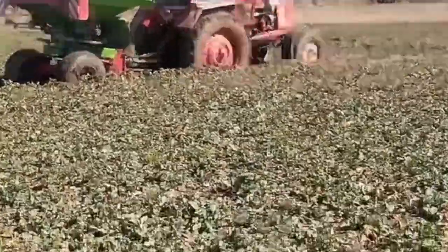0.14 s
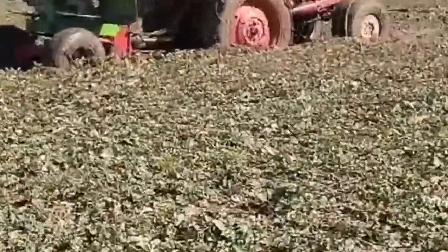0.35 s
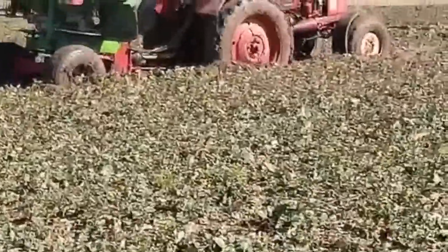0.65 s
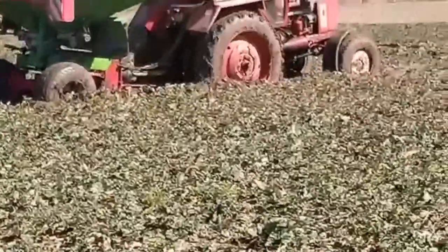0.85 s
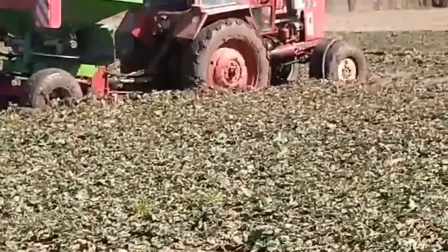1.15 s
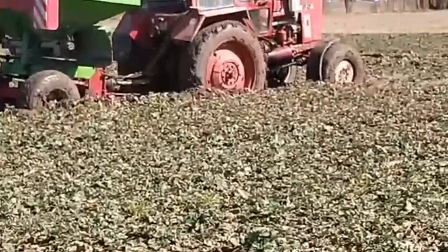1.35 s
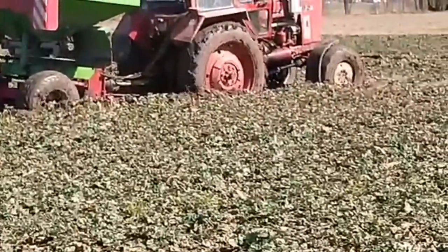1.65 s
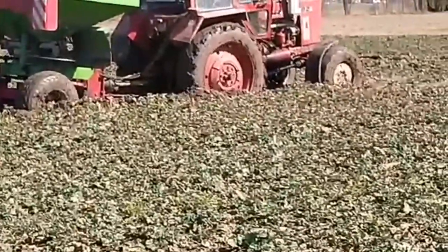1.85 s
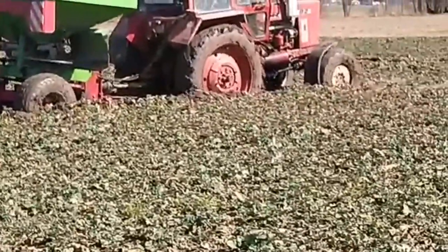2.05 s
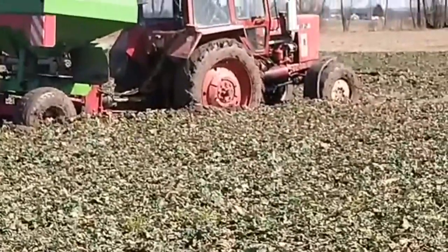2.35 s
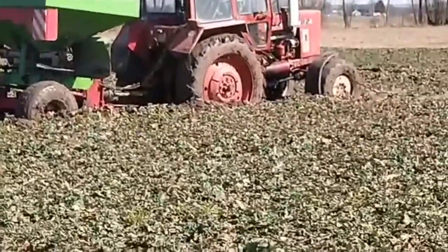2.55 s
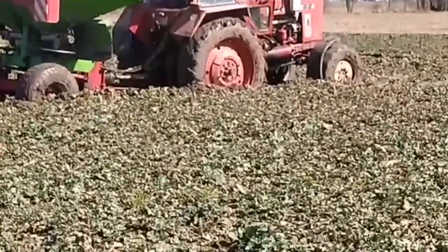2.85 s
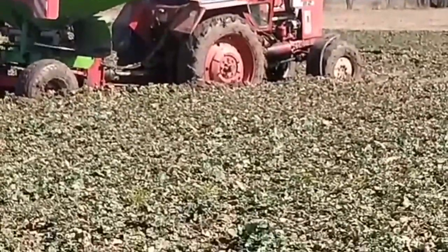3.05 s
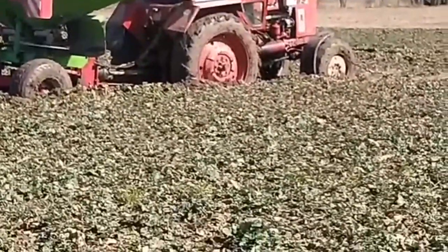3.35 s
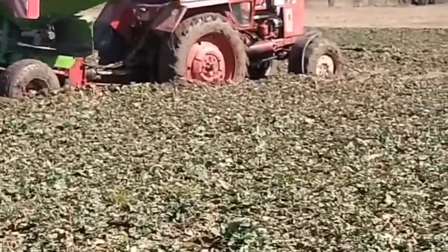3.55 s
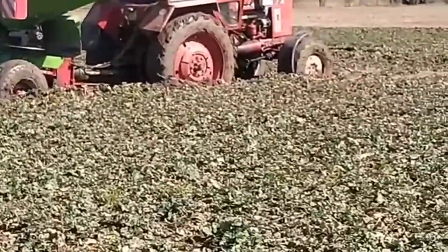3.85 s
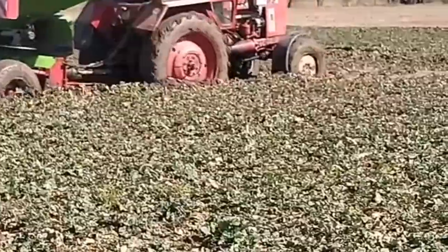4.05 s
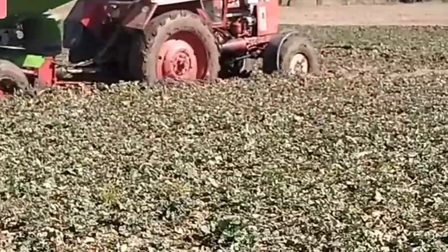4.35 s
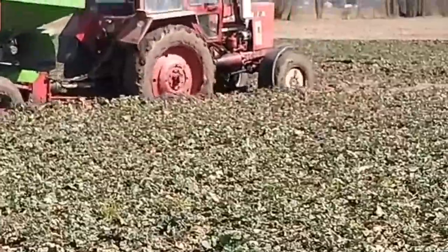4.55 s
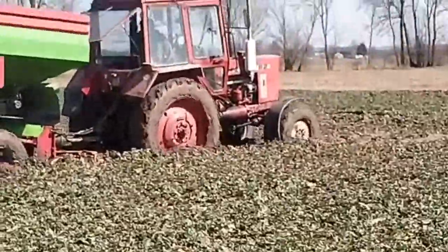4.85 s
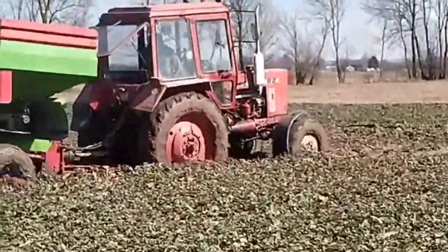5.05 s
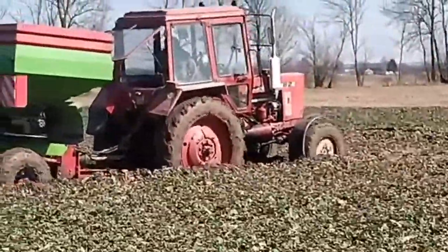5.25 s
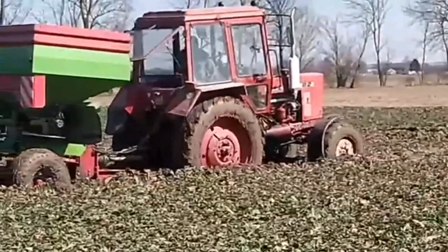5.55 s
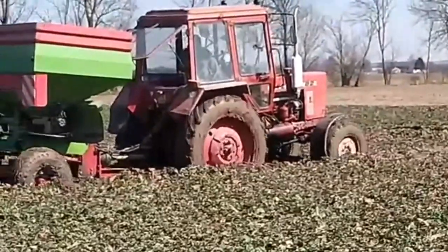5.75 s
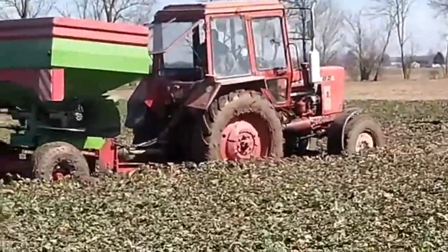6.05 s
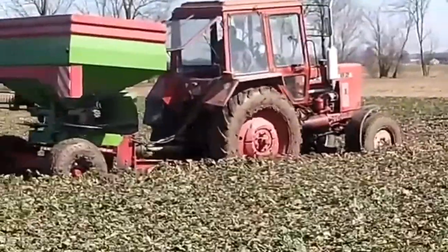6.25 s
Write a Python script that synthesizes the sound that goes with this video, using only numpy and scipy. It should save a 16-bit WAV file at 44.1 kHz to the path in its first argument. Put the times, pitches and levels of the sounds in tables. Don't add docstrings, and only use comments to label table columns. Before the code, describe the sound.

A tractor's diesel engine hums and rattles in an open field, sags to idle, then revs up and holds, while wind thumps the microphone early on.

```python
import sys
import numpy as np
from scipy import signal
from scipy.fft import rfft, irfft, next_fast_len
from scipy.io import wavfile
from scipy.ndimage import uniform_filter1d

SR = 44100
rng = np.random.default_rng(int(sys.argv[2]) if len(sys.argv) > 2 else 0)


def boost(x):
    u = np.asarray(x, float) / 20
    return 10 ** u


def unload_audio(sound):
    columns = np.transpose(np.atleast_2d(sound))
    steps = np.round(np.clip(columns, -1, 1) * 32767)
    wavfile.write(sys.argv[1], SR, steps.astype(np.int16))


N = 282235
SIZE = next_fast_len(N)
TIME = np.arange(N) / SR
HZ = np.maximum(np.fft.rfftfreq(SIZE, 1 / SR), 1)
IDLE_HZ = 45


def rms_one(x):
    return x / np.sqrt(np.mean(x ** 2) + 1e-20)


def in_time(rows):
    s, *columns = np.transpose(rows)
    return [np.interp(TIME, s, c) for c in columns]


def at_hz(points, hz=HZ):
    points = np.array(points)
    return np.interp(np.log(hz), np.log(points[:, 0]), points[:, 1])


def causal(points):
    cepstrum = irfft(at_hz(points) * np.log(10) / 20, SIZE)
    cepstrum[1:SIZE // 2] *= 2
    cepstrum[SIZE // 2 + 1:] = 0
    return np.exp(rfft(cepstrum))


def filtered(lines, response=1):
    return irfft(lines * response, SIZE)[..., :N]


def drift(rate):
    step = 40
    r = np.exp(-2 * np.pi * rate * step / SR)
    slow = signal.lfilter([1], [1, -2 * r, r * r], rng.standard_normal(N // step + 2002))[2000:]
    return np.interp(np.arange(N) / step, np.arange(len(slow)), rms_one(slow - slow.mean()))


def resonances(x, modes):
    out = 0
    for hz, width, top_db in modes:
        r = np.exp(-np.pi * width / SR)
        poles = [1, -2 * r * np.cos(2 * np.pi * hz / SR), r * r]
        out = out + boost(top_db) * signal.lfilter([(1 - r * r) / 2, 0, (r * r - 1) / 2], poles, x)
    return out


def engine():
    # (time [s], firing rate [Hz])
    speed_curve = [(0.2, 62), (1.2, 64.6), (1.52, 65.1), (1.65, 58.5), (1.8, 52.15), (2, 48.52),
                   (2.5, 44.7), (3.25, 43.83), (3.5, 46.56), (3.7, 47.7), (3.9, 51.82), (4, 52.78),
                   (4.1, 55.37), (4.3, 61.4), (4.5, 68.25), (4.62, 70.35), (4.95, 69.5), (6.4, 69.59)]
    # (time [s], load [0-1], fuelling over idle [dB])
    load_curve = [(0, 0.75, 13.5), (.7, 0.83, 8.5), (1.48, 0.6, 12), (1.57, 0.2, -1), (2.43, 0.01, 2.5),
                  (2.47, 0.04, 12.5), (2.8, 0, 4.5), (3.3, 0.14, 4), (3.725, 0.23, 2), (3.745, 0.87, 7.5),
                  (4.2, 0.74, 11.5), (4.64, 0.36, 7.5), (4.68, 0.09, 1), (4.76, 0.03, 8.5), (5.3, 0.15, 13),
                  (6.4, 0.15, 7.5)]
    # (time [s], share [0-1])
    facing_curve = [(0, 0.11), (.4, 0.2), (.9, 0.08), (1.45, 0.02), (3.6, 0.08), (3.85, 0), (4.2, 0.25),
                    (5.3, 0.18), (5.9, .8), (6.2, 0.84), (6.4, 0.85)]
    # (level at idle [dB], share of fuelling [dB/dB], speed effect [dB/octave], gain when side on [dB])
    ranges = [
        (-41, 0.076, 5, 2),
        (-46, 0.56, 4.5, 2.5),
        (-44, 0.29, 7, 6),
        (-50.5, 0.18, 8, 8),
    ]

    speed, = in_time(speed_curve)
    firings = np.cumsum(speed) / SR
    octaves = np.log2(speed / IDLE_HZ)
    load, fuel_db = in_time(load_curve)
    load = np.clip(load, 0, 1)
    facing, = in_time(facing_curve)

    noise = block(firings, load, burst=0.69, regular=0.66)
    below = [0 * HZ] + [1 / (1 + (HZ / hz) ** 8) for hz in (600, 1500, 4900)] + [1 + 0 * HZ]
    rattle = 0
    for low, high, (idle_db, share, octave_db, facing_db) in zip(below, below[1:], ranges):
        level_db = idle_db + share * fuel_db + octave_db * octaves + facing_db * facing
        level_db = level_db + 0.48 * drift(0.9) + 1.0 * drift(25.3)
        band = filtered(noise, high - low)
        rattle = rattle + boost(level_db) * band / np.std(band.mean(axis=0))

    hum_db = -50.5 + 18.5 * np.sqrt(load) + 11.5 * octaves * (1 - load)
    hum = exhaust(firings, load, hum_db) + gearbox()
    low_notes = np.array([boost(-3.0) * np.roll(hum, 8), boost(-8.0) * hum])
    return crossing(rattle) + low_notes


def exhaust(firings, load, hum_db):
    # (multiple of the firing rate [1], level when pulling [dB], level when running free [dB])
    orders = [(1, 1.5, 0), (1.5, -39, -26), (2, -3.5, -14), (2.5, -8, 0), (3, -5.5, -15), (3.25, -30, -11),
              (4, -13, -17), (4.25, -16, -22), (4.5, -21, -24), (4.75, -25, -7), (5, -14, -22),
              (5.5, -19, -11), (6, -18, -24), (6.5, -24, -26), (8.5, -39.5, -26)]
    # (frequency [Hz], width [Hz], gain [dB])
    pipe = [(166.8, 10.7, 0.5), (247, 40, -2.5), (322, 140, -23)]
    full_hz, high_order_loss_db = 69.5, 2.5

    octaves_below_full = np.log2(full_hz / SR / np.gradient(firings))
    hum = 0
    for multiple, pulling_db, free_db in orders:
        free_db = free_db - high_order_loss_db * (multiple - 1) * octaves_below_full
        level_db = load * pulling_db + (1 - load) * free_db + (.3 + .16 * multiple) * drift(4)
        phase = 2 * np.pi * multiple * firings + rng.uniform(0, 7) + .07 * multiple * drift(3)
        hum = hum + boost(level_db) * np.sin(phase)
    hum = hum + resonances(hum, pipe)
    return np.sqrt(2) * boost(hum_db) * hum


def gearbox():
    # (time [s], frequency [Hz], level [dB])
    whine = [(0, 245, -66), (.35, 251, -42), (.8, 256, -39), (1.2, 275, -49), (1.6, 272, -41),
             (1.85, 255, -35.5), (2.15, 223, -52), (2.6, 219, -62), (3.3, 225, -56), (3.55, 237.7, -36.5),
             (3.8, 221.6, -48), (4.05, 200.7, -39), (4.25, 213.4, -64), (4.45, 238.5, -33.5),
             (4.6, 244.7, -32), (4.75, 246.1, -40), (5.3, 246, -40.5), (5.8, 247, -35.5), (6.4, 248.3, -38)]
    hz, level_db = in_time(whine)
    phase = 2 * np.pi * np.cumsum(hz) / SR + .15 * drift(3)
    return np.sqrt(2) * boost(level_db + 1.5 * drift(3)) * np.sin(phase)


def block(firings, load, burst, regular):
    cylinders_db = [-1.5, -6, -3, -4]
    # (frequency [Hz], width [Hz], gain [dB])
    block_modes = [(860.6, 27, 6.5), (1138.4, 35, 2), (2232, 35, -6), (3658, 50, -5)]
    # (frequency [Hz], width [Hz], gain [dB])
    pulling_modes = [(946, 21, 10), (1013, 38, -1.5), (927, 63, 2.5), (699, 97, 6.5), (327, 32, 5.5)]
    # (frequency [Hz], density [dB per Hz])
    left_port = [(40, -5.5), (250, 11.5), (450, 10), (700, -6), (1150, 3.5), (1800, -11.5), (2300, -7),
                 (2650, -8), (3400, -5.5), (4500, -20), (5000, -15), (7000, -20), (9500, -16.5),
                 (12000, -20.5)]
    right_port = [(40, -5), (280, 7), (520, -1), (900, -0.5), (1350, -4), (2000, -4), (2850, -6.5),
                  (3500, -6.5), (4500, -15), (5300, -17), (6500, -9.5), (8800, -10), (10300, -18),
                  (12500, -31.5)]
    # (frequency [Hz], phase [rad])
    left_lead = [(0, 0), (950, -0.6), (1720, -3.2), (2840, -13.2), (3620, -17.5), (4650, -19.6),
                 (4910, -22.0), (5510, -19.2), (6550, -22.2), (7150, -24.6), (10300, -34.3), (11500, -40.6),
                 (11900, -40.7), (13200, -46.5)]
    # (frequency [Hz], likeness [0-1])
    likeness = [(60, 1), (300, .94), (600, .45), (1000, .93), (1550, .7), (1900, .45), (2300, .62),
                (2900, .58), (3400, .68), (4150, .78), (4700, .2), (5100, .2), (5500, .8), (6000, .45),
                (6600, .72), (7200, .4), (9000, .4), (12000, .4)]
    # (frequency [Hz], level [dB])
    ground = [(20, 5), (60, 5.5), (130, 1.5), (260, 2), (430, 1.5), (600, -5), (800, 0)]
    idle_knock = 0.8

    strength_db = np.array(cylinders_db)[firings.astype(int) % 4] + 1.0 * drift(30)
    burst = burst * (1 + idle_knock * IDLE_HZ / SR / np.gradient(firings))
    gate = 1 + burst * boost(strength_db) * np.exp(-(firings % 1) / 0.3)
    gate = gate / np.sqrt(uniform_filter1d(gate ** 2, size=8000))
    shaken = gate * boost(0.29 * drift(42.0)) * rng.standard_normal((3, N))
    shaken[0] += 0.46 * regular * contacts(firings, count=70, jitter_s=.00004, spread_db=-0.5)
    free_ring = (1 - 0.79 * load) * resonances(shaken, block_modes)
    shaken = shaken + free_ring + load * resonances(shaken, pulling_modes)

    shared, own_left, own_right = rfft(shimmer(rms_one(shaken), frames=14, bins=4), SIZE)
    alike = np.clip(at_hz(likeness), 0, 1)
    lead = np.exp(1j * np.interp(HZ, *np.transpose(left_lead)))
    left = np.sqrt(alike) * shared + np.sqrt(1 - alike) * own_left
    left = left * lead * boost(at_hz(left_port) - at_hz(right_port))
    right = np.sqrt(alike) * shared + np.sqrt(1 - alike) * own_right
    return np.array([left, right]) * causal(right_port) * causal(ground)


def contacts(firings, count, jitter_s, spread_db):
    angles, sizes = rng.uniform(0, 4, count), rng.standard_normal(count)
    cycles = np.arange(int(firings[-1] / 4))[:, None]
    chance = rng.standard_normal((len(cycles), count, 2))
    at = np.interp(4 * cycles + angles, firings, TIME) + jitter_s * chance[..., 0]
    clicks = np.zeros(N)
    places = np.clip(at * SR, 0, N - 1).astype(int)
    np.add.at(clicks, places, sizes * boost(spread_db * chance[..., 1]))
    blunt = signal.butter(2, 2500, fs=SR, output="sos")
    return rms_one(signal.sosfilt(blunt, clicks))


def shimmer(x, frames, bins):
    # (frequency [Hz], spread [dB])
    patchy = [(800, .5), (1500, .5), (3000, .6), (5000, 3), (7500, 1.5), (10000, 2), (13000, 2.5)]
    # (time [s], turn [0-1])
    casing = [(0, 0.34), (.6, 0.36), (.68, 0.63), (1.3, 0.89), (1.95, 0.9), (2.05, 0.85), (3.1, 0.45),
              (3.4, 0.67), (3.84, 0.4), (3.9, 0.2), (5.3, 0.37), (5.55, 0.64), (5.88, 0.67), (6, 0.26),
              (6.15, 0.46), (6.4, 0.83)]
    # (time [s], frequency [Hz], level [dB])
    wandering_notch = [(0, 1420, 2), (.85, 1400, 2.5), (1.0, 1445, -15), (1.3, 1430, -12), (1.45, 1580, -1),
                       (1.6, 1580, -13), (2.2, 1570, -7), (2.55, 1515, -3.5), (2.7, 1390, -13), (3.0, 1575, -8),
                       (3.4, 1577, -11), (3.62, 1445, -12), (3.9, 1500, 1), (4.5, 1554, -0.5), (4.8, 1600, -8),
                       (5.5, 1600, -5.5), (5.85, 1580, -15), (6.05, 1600, -1)]

    def bump(centre_hz, width_hz):
        return np.exp(-((hz[:, None] - centre_hz) / width_hz) ** 2)

    hz, s, cells = signal.stft(x, SR, nperseg=512)
    field = rng.standard_normal(cells.shape)
    for axis, size in ((1, bins), (2, frames), (1, bins), (2, frames)):
        field = uniform_filter1d(field, size=size, axis=axis)
    turn = np.interp(s, *np.transpose(casing))
    notch_db = (4.5 - 21 * turn) * bump(4930 + 350 * turn, 450)
    notch_db += -4 * np.sqrt(np.clip(turn + 0.19, 0, 1)) * bump(6722 - 400 * turn, 120)
    dip_s, dip_hz, dip_db = np.transpose(wandering_notch)
    notch_db += np.interp(s, dip_s, dip_db) * bump(np.interp(s, dip_s, dip_hz), 73)
    cells = cells * boost(at_hz(patchy, hz + 1)[:, None] * rms_one(field) + notch_db)
    return signal.istft(cells, SR, nperseg=512)[1][:, :N]


def crossing(x):
    # (frequency [Hz], left [dB], right [dB], left lead [rad])
    seen_from_behind = [(416, 0, -0.5, -0.37), (980, 0.5, -0.5, 0.017), (1366, -2, 0, -0.59),
                        (1760, -5.5, 1.5, 1.3), (2023, 3.5, -3, -1.1), (2510, 5.5, 2, -0.56),
                        (3040, -1, 0, -0.16), (3910, -2, -2.5, 1.03), (4260, 9, -3.5, -1.2),
                        (4520, 1, 4.5, 0.49), (5980, 8, 2.5, 0), (7640, 5, -2, 0.94),
                        (10500, 2.5, 5.5, 0.83), (12500, -2, 3.5, 0.2)]
    seen_abreast = [(406.7, 0, 0.5, -0.52), (945, -3, -2, 0.067), (1620, 0.5, 0.5, 0.07),
                    (2200, 0, -3, 0.95), (2600, -3.5, 0.5, 0.94), (2950, -2, 0.5, 0.089),
                    (3329, -2.5, -5, 0.2), (3900, -1, -0.5, 0.35), (4340, -3, -0.5, 1),
                    (5093, 0.5, 5, -0.32), (5860, 4, -1.5, -2), (7750, 1.5, -2, 0.28), (10400, 4, 4, 0),
                    (12800, -1, 1.5, 0.42)]
    behind_fades = [0.76, 4.3]
    abreast_grows = [4.766, 5]

    behind = np.interp(TIME, behind_fades, [1, 0])
    abreast = np.interp(TIME, abreast_grows, [0, 1])
    out, lines = x.copy(), rfft(x, SIZE)
    for view, share in ((seen_from_behind, behind), (seen_abreast, abreast)):
        hz, *columns = np.transpose(view)
        left_db, right_db, lead = (np.interp(np.log(HZ), np.log(hz), c) for c in columns)
        seen = filtered(lines, [boost(left_db) * np.exp(1j * lead), boost(right_db)])
        out += share * (seen - x)
    return out


def thumps():
    # (time [s], peak [dB], frequency [Hz], overtone [dB])
    puffs = [(0.3, -11, 170, -21), (0.337, -22, 200, -21), (0.36, -10.5, 278, -20), (0.378, -18, 159, -7),
             (0.405, -11, 147, -17), (0.417, -15, 117, -21), (0.438, -7, 174, -27), (0.46, -20, 197, -22),
             (0.796, -9.5, 201, -17), (0.833, -8, 264, -24), (0.849, -3.5, 232, -22), (0.884, -8, 260, -23),
             (0.897, -19, 220, -22), (0.912, -14, 196, -18), (0.948, -20, 235, -17), (1.001, -10, 162, -24),
             (1.146, -19, 350, -18), (1.175, -14, 245, -22), (1.19, -6.5, 265, -25), (1.232, -15, 137, -22),
             (1.253, -9, 196, -33), (1.46, -10, 177.5, -23), (1.484, -17, 248, -14),
             (1.647, -14, 138.7, -27), (1.734, -24, 188, -24), (1.756, -11, 162, -32),
             (1.786, -15, 180, -28), (2.017, -25, 144, -25), (2.045, -20, 161, 2), (2.079, -4, 166, -8),
             (2.095, -7.5, 157, -24), (2.126, -7, 146, -34), (2.173, -15, 195, -21), (2.191, -10, 186, -15),
             (2.221, -27, 193.7, -15), (2.244, -5.5, 157, -18), (2.255, -16, 113.2, -26),
             (2.284, 0, 254, -20.5), (2.297, -17.5, 168, 2), (2.331, -14, 137, -10), (2.449, -12, 298, -23),
             (2.474, -8, 241, -24), (2.693, -12, 283, -20), (2.738, -15, 231, -20),
             (2.752, -12.5, 240, -16), (2.778, -24, 155, -25), (2.794, -8.5, 216, -32)]
    # (time [s], peak [dB], frequency [Hz])
    snaps = [(2.047, -15.5, 498), (2.0775, -19, 772), (2.111, -16, 531.3), (2.285, -38, 700),
             (2.298, -28, 845), (2.385, -30, 520), (2.449, -23, 604), (2.466, -29, 853.4)]
    puff_rise_s, puff_ring_s, overtone_ring_s, snap_ring_s = 0.002, 0.003, 0.0024, 0.0017
    port_db = np.array([[4.0], [-18]])

    out, age = np.zeros((2, N)), np.arange(2000) / SR
    for s, peak_db, hz, overtone_db in puffs:
        thump = np.sin(2 * np.pi * hz * age) * np.exp(-age / puff_ring_s)
        overtone = np.sin(2 * np.pi * 2.13 * hz * age) * np.exp(-age / overtone_ring_s)
        thump += boost(overtone_db + 8.5) * overtone
        thump *= 1 - np.exp(-age / puff_rise_s)
        out[:, round(s * SR):][:, :len(age)] += boost(peak_db + port_db) * thump
    for s, peak_db, hz in snaps:
        swell = age / snap_ring_s * np.exp(1 - 2 * age / snap_ring_s)
        snap = np.sin(2 * np.pi * hz * age) * swell
        out[0, round(s * SR):][:len(age)] -= boost(peak_db + 7.5) * snap
    return out


def wind():
    # (start [s], length [s], flutter [dB], slow push [dB])
    left_gusts = [(0.06, 0.14, -27, -30), (0.33, 0.14, -28.5, -28.5), (0.824, 0.083, -15.5, -26.5),
                  (0.937, 0.072, -21, -27.5), (1.072, 0.084, -28.5, -34), (1.157, 0.11, -23, -29.5),
                  (1.46, 0.034, -20, -25.5), (1.565, 0.11, -28.5, -32.5), (1.715, 0.09, -27, -27),
                  (2.028, 0.091, -15.5, -23), (2.174, 0.16, -23.5, -24), (2.457, 0.091, -29, -27),
                  (2.67, 0.16, -25.5, -28), (2.736, 0.1, -31, -29), (4.603, 0.17, -30, -44),
                  (6.15, 0.1, -50, -49)]
    # (start [s], length [s], level [dB])
    sheltered = [(.39, .04, -44), (.96, .04, -42), (2.28, .04, -43), (3.95, .04, -42), (5.45, .03, -47),
                 (5.74, .04, -44)]
    # (frequency [Hz], density [dB per Hz])
    flutter_colour = [(50, -28.5), (100, -19.5), (160, -2), (300, -9.5), (450, -14), (700, -42.5),
                      (1200, -46)]
    push_colour = [(8, 0), (25, 5), (60, 4.5), (110, 1), (300, -41.5)]
    # (frequency [Hz], width [Hz], gain [dB])
    cavity = [(175.5, 53, 4)]
    breeze_db, lull_db = -42, -68
    rise, fall = 524, 202
    lag = 0.72

    flutter, push = causal(flutter_colour), causal(push_colour)
    eddies = filtered(rfft(rng.standard_normal((3, SIZE))), [flutter, push, flutter + 1.0 * push])
    eddies[0] += resonances(eddies[0], cavity)
    lumps = boost(np.array([1.5 * drift(30), 2 * drift(12), 2.5 * drift(15)]) - 1.5)
    rows = np.array(left_gusts)
    levels = [gust_gain(rows[:, :3], breeze_db, lull_db, rise, fall),
              gust_gain(rows[:, [0, 1, 3]], breeze_db, lull_db, lag * rise, lag * fall),
              gust_gain(sheltered, -49, -54.5, 90, 90)]
    left_flutter, left_push, right = eddies / np.std(eddies, axis=1, keepdims=True) * lumps * levels
    return np.array([boost(-3.0) * left_flutter + left_push, right])


def gust_gain(rows, breeze_db, lull_db, rise, fall):
    t = TIME[::32]
    lull_from_s = 1.8
    power = boost(2 * np.interp(t, [lull_from_s - .05, lull_from_s + 0.11], [breeze_db, lull_db]))
    for s, length, top_db in rows:
        gust_db = top_db - rise * np.maximum(s - t, 0) - fall * np.maximum(t - s - length, 0)
        power = power + boost(2 * gust_db)
    return np.interp(TIME, t, np.sqrt(power))


def scene():
    return engine() + thumps() + wind()


def thrifty(x):
    # (frequency [Hz], level [dB])
    thrift = [(900, -35), (1400, -7), (3000, -8), (4100, -4), (5200, -2), (5900, -1.8), (6600, -2),
              (7800, -8), (9300, -6), (10300, -1), (11300, 1.5), (11800, 3), (12500, 1.5), (13100, 4),
              (13500, 9)]
    # (frequency [Hz], spread [dB])
    fickle = [(1000, 1), (4000, 1), (6000, 1.8), (8000, .5), (10000, 2), (13000, 3)]
    # (time [s], length [s], extra muting [dB], centre [Hz])
    starved = [(.06, .04, 8, 7300), (.36, .016, 12, 7600), (.4, .016, 10, 7600), (.49, .025, 13, 7300),
               (1.53, .016, 10, 5800), (1.65, .016, 8, 5800), (1.8, .15, 3, 5300), (2.19, .016, 7, 5800),
               (2.29, .02, 9, 5800), (2.64, .02, 10, 5600), (3.37, .012, 8, 5800), (3.82, .035, 10, 4600),
               (3.97, .016, 8, 5500), (4.65, .016, 7, 4900), (5.37, .016, 7, 5000), (5.75, .14, 4, 5100),
               (6.28, .13, 7, 5700)]
    starved_width_hz, band_lines = 800, 14

    frame = dict(fs=SR, window="cosine", nperseg=2048, noverlap=1024)
    lead_in = 1024 - 201
    mid_side = [x[0] + x[1], x[0] - x[1]]
    hz, s, cells = signal.stft(np.hstack([np.zeros((2, lead_in)), mid_side]), **frame)
    s = s - lead_in / SR
    power = np.abs(cells) ** 2
    around = uniform_filter1d(power.mean(axis=0), size=71, axis=0)
    around = uniform_filter1d(around, size=5, axis=1)
    starts = np.arange(0, len(hz), band_lines)
    band = np.arange(len(hz)) // band_lines

    waver = rng.standard_normal((len(starts), len(s)))[band]
    mute_db = at_hz(thrift, hz + 1)[:, None] + at_hz(fickle, hz + 1)[:, None] * waver
    for at, length, more_db, centre_hz in starved:
        off_centre = (hz[:, None] - centre_hz) / starved_width_hz
        mute_db += more_db * np.exp(-((s - at) / length) ** 4 - off_centre ** 4)
    limit = around * boost(2 * mute_db)
    heard = np.add.reduceat(power, starts, axis=1) > np.add.reduceat(limit, starts, axis=0)
    kept = cells * heard[:, band] * (power > 1.2 * limit)
    mid, side = signal.istft(kept, **frame)[1][:, lead_in:][:, :N]
    return np.array([mid + side, mid - side]) / 2


def roll_off(x):
    return signal.sosfilt(signal.butter(12, 13600, fs=SR, output="sos"), x)


def record(dry):
    mix = thrifty(dry)
    return roll_off(mix)


dry = scene()
out = record(dry)
unload_audio(out)
```